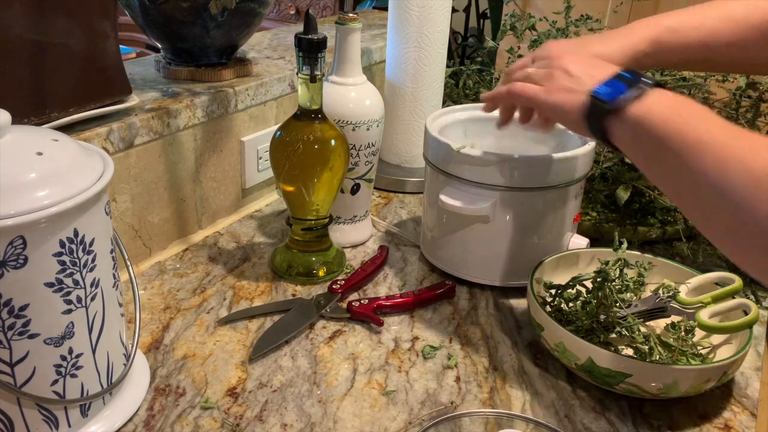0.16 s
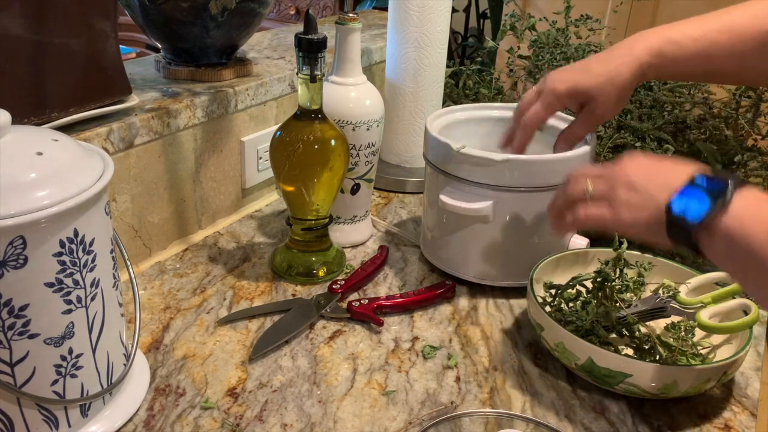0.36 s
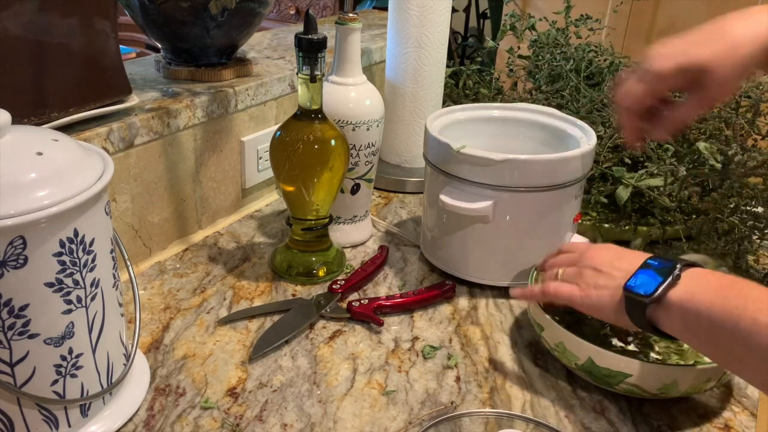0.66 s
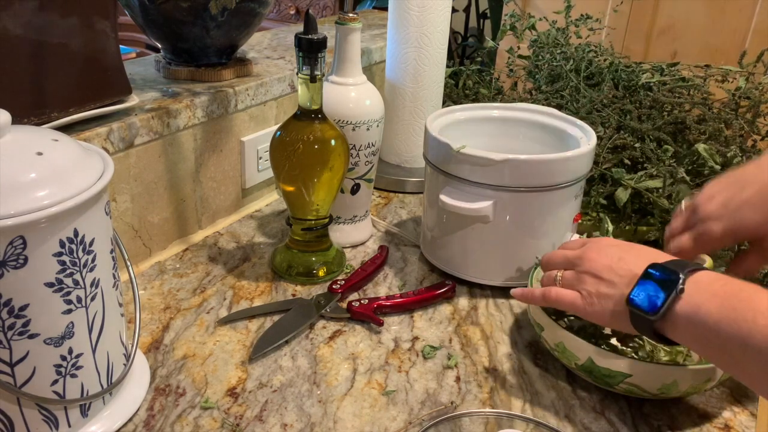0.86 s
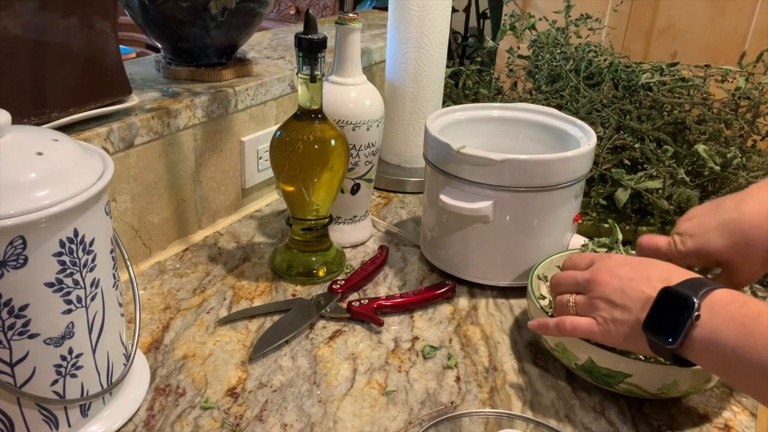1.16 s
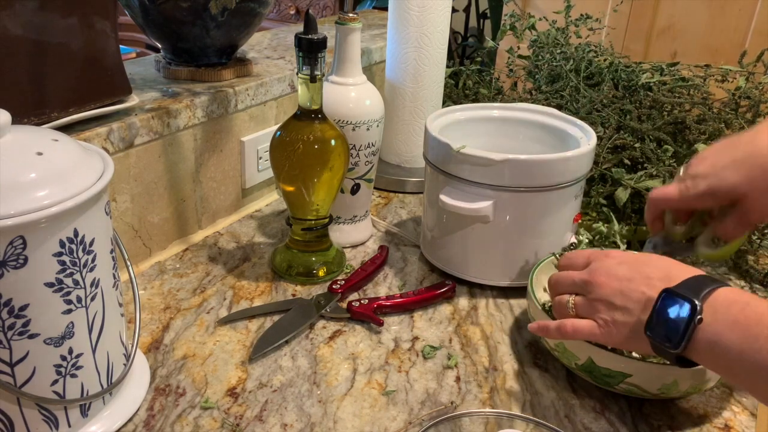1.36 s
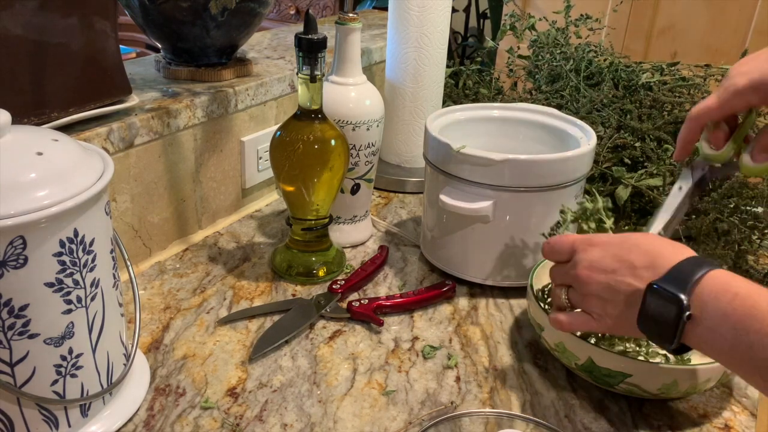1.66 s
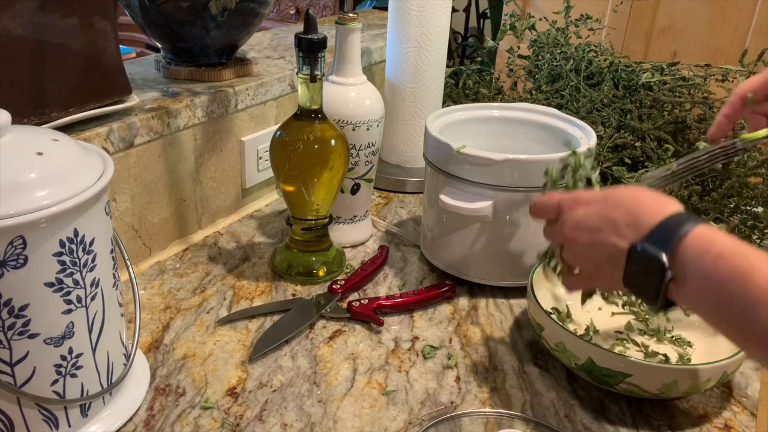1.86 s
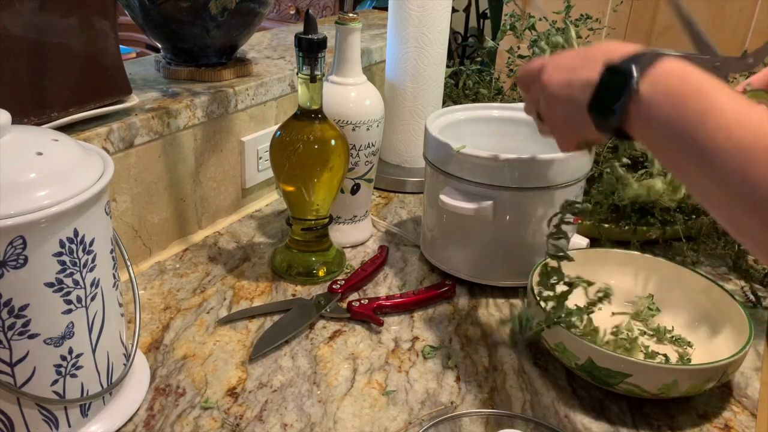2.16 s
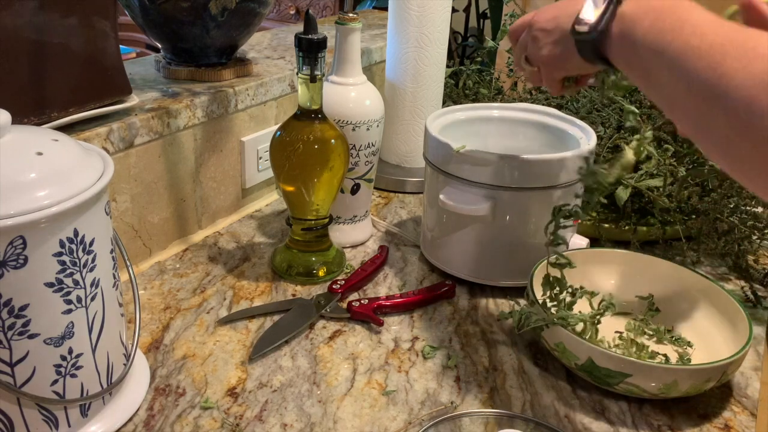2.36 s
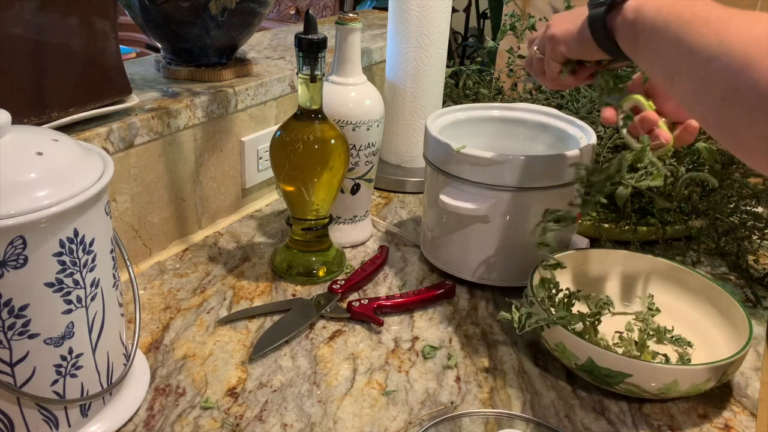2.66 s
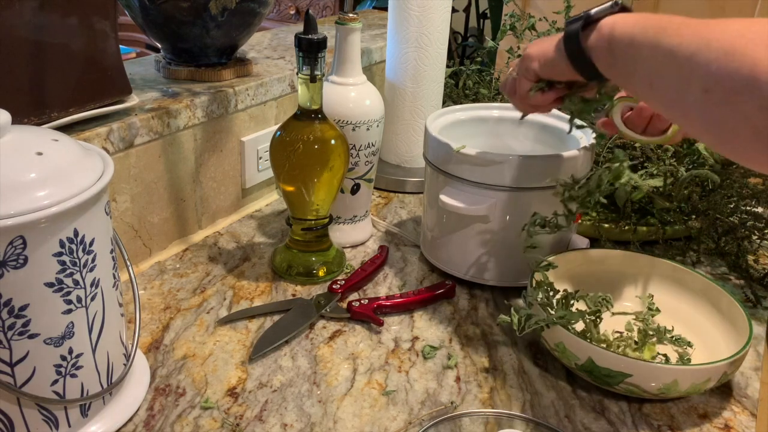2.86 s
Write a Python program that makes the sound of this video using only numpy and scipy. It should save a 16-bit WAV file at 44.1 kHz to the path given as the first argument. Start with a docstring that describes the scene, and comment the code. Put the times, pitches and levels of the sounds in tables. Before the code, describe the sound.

Dry herbs rustle and crackle close to a phone microphone: near silence, a dense loud burst with dull knocks on a ceramic bowl, then lighter uneven rustles and snaps in a quiet kitchen with faint hum.

```python
"""Hands gather and lift dry herb sprigs out of a ceramic bowl on a kitchen counter, close to a phone.
Leaves rustle as dense tiny cracks, stems snap, scissors knock the bowl so that it rings briefly;
a fridge hums over quiet room noise and slow air pressure rocks the microphone."""
import sys
import numpy as np
from scipy import signal
from scipy.fft import rfft, irfft, next_fast_len
from scipy.io import wavfile
from scipy.ndimage import uniform_filter1d

SR = 44100
rng = np.random.default_rng(int(sys.argv[2]) if len(sys.argv) > 2 else 0)


def unload_wav(signal):
    """Save mono or channel-first audio to the path in sys.argv[1] as 16-bit WAV at rate SR, clipped to [-1, 1]."""
    wavfile.write(
        sys.argv[1],
        SR,
        np.round(np.clip(np.atleast_2d(signal).T, -1, 1) * 32767).astype(np.int16),
    )


N = 132300

# handling of the herbs (s, level dB of: leaf rustle, its top octave, stem scrape, the rustle's lower treble)
HANDLING = [(0.0, -60, -65, -72, -69), (0.05, -75, -72, -71, -74),
            (0.12, -61.5, -68, -84, -67),
            (0.21, -62, -67.5, -72, -80),
            (0.3, -71, -84, -66.5, -72.5), (0.4, -78, -91, -86, -87),
            (0.47, -77, -80, -94, -105), 
            (0.5205, -74, -87, -89, -86), (0.5225, -58, -71, -69, -70),
            (0.54, -43.5, -43, -59, -46), (0.56, -42, -54, -53.5, -51),
            (0.62, -44, -42.5, -45.5, -47), (0.68, -41, -48, -57, -48),
            (0.72, -46.5, -50, -71, -56.5), 
            (0.82, -45.5, -63, -70, -58.5), (0.85, -52, -54, -63, -64),
            (0.88, -43, -51, -70, -50), (0.93, -53, -63, -47, -62),
            (0.96, -56, -62, -59.5, -62), (1.03, -56.5, -71, -62, -70.5),
            (1.1, -59, -66, -64, -73), 
            (1.25, -53.5, -70, -63, -72), (1.33, -47, -60, -60, -62),
            (1.42, -51.5, -64, -67, -69), (1.52, -59, -65, -65, -66.5),
            (1.62, -62.5, -73, -73, -71), (1.67, -48.5, -61, -69, -58),
            (1.75, -55.5, -65.5, -69, -68), (1.84, -48, -55, -80, -51),
            (1.9, -54, -61, -68, -59.5), (1.98, -53, -63.5, -79, -57.5),
            (2.1, -49, -60, -64.5, -58.5), (2.2, -50, -60, -63.5, -54), (2.3, -55.5, -57.5, -69, -61),
            (2.4, -55, -67, -70, -61), (2.51, -60.5, -63, -68, -65), (2.6, -56.5, -61, -65.5, -66.2),
            (2.7, -54, -59, -59, -63.7), (2.76, -52, -56.0, -58, -67),
            (2.84, -44, -47.5, -52.5, -57.5), (2.91, -48.5, -56, -52, -65),
            (3.0, -58, -80, -66, -70)]
# colour of leaves and of stems (Hz, dB per Hz)
LEAF = [(1760, -12.5), (3000, -13.5), (4600, -6), (6570, 6), (7560, 7), (8700, 0), (11000, -8), (15100, -25.5),
        (16000, -20)]
STEM = [(300, -26.5), (545, -8), (750, -14.5), (1300, -13), (1950, -7), (2350, 1), (2750, -8), (3300, -8.5), (4500, -16)]  # fixed
STEM_GRAINS_PER_S, STEM_SPREAD_DB, STEM_GRAIN_S = 1400, 0.5, 0.0017
# snaps of leaves and stems (s, level dB, centre Hz, stem share dB, length s)
SNAPS = [(0.0067, -54, 4000, -16, 0.0136), (0.0764, -51, 5600, -8, 0.0059), (0.1103, -54, 9800, -20, 0.0041),
         (0.1229, -52, 7500, -17, 0.0063), (0.1325, -48, 8200, -21, 0.0082), (0.1397, -49, 10900, -14, 0.0082),
         (0.2722, -60, 8200, -13, 0.005), (0.37, -65, 4000, -13, 0.01), (0.5225, -47, 7500, -21, 0.003),
         (0.5704, -32, 4800, -11, 0.0118), (0.601, -30, 7900, -17, 0.0036), (0.6097, -27, 4000, -24, 0.0036),
         (0.6195, -33, 4500, -24, 0.0077), (0.6398, -29, 7500, -32, 0.005), (0.6453, -30, 4900, -24, 0.0073),
         (0.6895, -32, 7000, -24, 0.004), (0.693, -27, 6000, -25, 0.0091), (0.6993, -33, 5900, -19, 0.0109),
         (0.7039, -33, 6800, -19, 0.0063), (0.7083, -31, 10300, -25, 0.0045), (0.7171, -26, 10100, -33, 0.0023),
         (0.7458, -31, 6600, -30, 0.0063), (0.7495, -36, 7700, -24, 0.0086), (0.7648, -26, 5900, -35, 0.0018),
         (0.7932, -25, 8800, -33, 0.002), (0.7963, -24, 8100, -33, 0.0027), (0.8, -35, 5000, -21, 0.0059),
         (0.8064, -33, 7900, -41, 0.0032), (0.8147, -32, 7800, -27, 0.0018), (0.8407, -34, 8000, -37, 0.0036),
         (0.8653, -30, 9100, -23, 0.0018), (0.8684, -34, 6200, -21, 0.0068), (0.8826, -28, 9600, -20, 0.0018),
         (0.9118, -31, 5900, -38, 0.0027), (0.9277, -39, 6400, -9, 0.0091), (1.0078, -41, 6800, -26, 0.0027),
         (1.0966, -40, 13900, -23, 0.0027), (1.1078, -41, 8100, -37, 0.0018), (1.117, -33, 7300, -22, 0.0018),
         (1.2863, -39, 8200, -24, 0.0054), (1.3236, -35, 6700, -16, 0.0027), (1.3965, -39, 7800, -23, 0.0014),
         (1.4946, -32, 7400, -23, 0.0023), (1.4996, -43, 5700, -12, 0.0082), (1.5446, -42, 6000, -35, 0.0018),
         (1.5707, -48, 8000, -21, 0.0073), (1.6582, -34, 8300, -29, 0.0023), (1.6638, -38, 6300, -21, 0.0018),
         (1.675, -36, 8200, -25, 0.0018), (1.6794, -27, 7400, -32, 0.0023), (1.7106, -32, 7300, -26, 0.0032),
         (1.7287, -41, 5700, -18, 0.0068), (1.7656, -36, 7500, -31, 0.0018), (1.7749, -37, 5900, -24, 0.0023),
         (1.7875, -37, 7000, -28, 0.002), (1.7895, -31, 6600, -29, 0.0027), (1.8078, -37, 6200, -40, 0.0036),
         (1.8165, -41, 6700, -30, 0.006), (1.8318, -34, 6500, -24, 0.0023), (1.834, -40, 5000, -14, 0.01),
         (1.8417, -31, 6500, -24, 0.0036), (1.9858, -37, 7800, -24, 0.005), (1.9907, -39, 7900, -22, 0.0054),
         (2.0015, -37, 7900, -18, 0.0041), (2.0316, -38, 6200, -37, 0.0032), (2.0605, -37, 6400, -30, 0.0023),
         (2.1955, -39, 6000, -21, 0.0095), (2.2162, -41, 8100, -12, 0.0041), (2.2737, -33, 6700, -11, 0.0059),
         (2.2791, -36, 6000, -16, 0.0082), (2.3606, -42, 7400, -20, 0.0054), (2.422, -41, 6300, -31, 0.0032),
         (2.4611, -45, 6600, -16, 0.0118), (2.4996, -39, 8900, -23, 0.0032), (2.533, -31, 6100, -23, 0.0032),
         (2.601, -40, 10600, -19, 0.0023), (2.6512, -32, 7500, -25, 0.0032), (2.6671, -39, 12300, -19, 0.0036),
         (2.702, -40, 7500, -35, 0.0036), (2.7122, -36, 10800, -9, 0.0036), (2.7209, -36, 10900, -5, 0.0091),
         (2.7581, -39, 7400, -3, 0.0091), (2.7998, -33, 7600, -10, 0.0045), (2.8087, -32, 7200, -19, 0.0018),
         (2.8259, -30, 6800, -22, 0.0018), (2.8315, -30, 7300, -21, 0.0023), (2.8988, -37, 4400, -12, 0.0068),
         (2.9093, -38, 7700, -18, 0.0086), (2.9246, -44, 6200, -4, 0.0073), (2.9744, -39, 10700, -19, 0.0036)]  # fixed
# ring of the bowl (Hz, t60 s)
BOWL = [(673, .15), (1508, .25), (2579, .25), (3835, .21), (5208, .11), (6702, .1)]  # fixed
# knocks on the bowl (s, dB of each mode (none where hands damp it), clack dB, clack Hz, clack t60 s, pitched share of the clack 0-1)
KNOCKS = [(.5712, (-58, -66, -62, -48, -36, -33), -32, 1500, .016, .7),  # fixed
          (.5735, (), -33, 620, .045, .7),  # fixed
          (.581, (), -36, 1000, .03, .6),  # fixed
          (.587, (), -37, 520, .03, .5),  # fixed
          (.635, (), -41, 1150, .025, .6),  # fixed
          (.651, (), -43, 1500, .05, .7),  # fixed
          (.917, (-54, -64, -70, -51, -49, -50), -37, 1680, .022, .85),  # fixed
          (.935, (-43, -56, -58, -64, -62, -62), -31, 1560, .022, .95),  # fixed
          (1.140, (), -55, 1300, .03, .3),  # fixed
          (1.161, (), -51, 1560, .04, .85)]  # fixed
ROOM_T60_S, ROOM_DB = .25, -13  # fixed
# room noise (Hz, dB per Hz)
AIR = [(35, -3), (60, -6.5), (100, -12.5), (160, -11.5), (300, -19), (700, -26.5), (1500, -32), (3000, -36), (7000, -45), (16000, -50.5)]
AIR_DB, HUM_HZ, HUM_DB, HUM_WAVER_DB = -61, 119.7, -60.5, 1.2
# slow air pressure: colour (Hz, dB per Hz) and level (s, dB)
PRESSURE = [(1, -15.5), (3, -2), (7, 6), (12, -18.5), (20, -22), (30, -27), (35, -80), (42, -47), (60, -114)]
PRESSURE_LEVEL = [(0, -37.5), (.4, -31), (.7, -28), (1.1, -33.5), (1.4, -38.5), (1.9, -31.5), (2.4, -32), (2.7, -44), (3, -31.5)]
TOP_HZ = 16000  # fixed
# colour of stems while they scrape the bowl, until they are lifted out (Hz, dB per Hz)
STEM_IN_BOWL = [(200, -11.5), (350, -16), (600, -2), (850, -2), (1100, -3.5), (1550, -1), (1900, -3), (3000, -12), (4500, -14.5)]
LIFT_S, LIFT_LASTS_S = 1.18, 0.79
SNAP_WIDTH, SNAP_CENTRE_DB, SNAP_RISE, SNAP_RAGGED_DB = .2, 9, .18, 1.8  # fixed; width as share of centre, rise as share of length
SCRAPE_RING_DB = -23  # fixed
GRAINS_PER_S, GRAIN_S = 3000, .0012  # fixed; leaf cracks
GRAIN_SPREAD_DB, CLUSTER_DB, SNAP_BRIGHT = 2.4, 2.1, 0.4  # fixed; brightness = share of the last sample taken off
# faint thin tones (start s, length s, Hz, dB rms)
TONES = [(.12, .09, 1610, -77), (.22, .12, 1735, -76), (1.645, .18, 1507, -75)]  # fixed
SNAP_TINT = .7  # fixed; share of the leaf colour that a snap takes on, so it spans more of the treble


def undb(db):
    """Decibels to gain."""
    return 10 ** (np.asarray(db) / 20)


def unit(x):
    """Scale to rms 1."""
    return x / np.sqrt(np.mean(x ** 2))


def curve(table, axis):
    """A table column joined by straight lines in time."""
    rows = np.array(table)
    return np.interp(np.arange(N) / SR, rows[:, 0], rows[:, axis])


def colour(x, table):
    """Filter by (Hz, dB) points; the end levels hold beyond the ends."""
    size = next_fast_len(len(x) + 4096)  # fixed
    rows, hz = np.array(table), np.maximum(np.fft.rfftfreq(size, 1 / SR), 1e-3)  # fixed
    return irfft(rfft(x, size) * undb(np.interp(np.log(hz), np.log(rows[:, 0]), rows[:, 1])), size)[:len(x)]


def band(x, hz, width):
    """Two-pole resonance, gain 1 at the centre; width as share of the centre."""
    return signal.lfilter(*signal.iirpeak(min(hz, .45 * SR), 1 / np.clip(width, .02, 2), SR), x)  # fixed


def walk(rate):
    """Random levels held 1 / rate s and slewed; spread near 1."""
    k = int(SR / rate)
    return unit(uniform_filter1d(np.repeat(rng.standard_normal(N // k + 1), k), k)[:N])


def add(out, at_s, x):
    """Mix x into out from a given time."""
    i = int(at_s * SR)
    out[i:i + len(x)] += x[:len(out) - i]


def grains(per_s, spread_db, grain_s):
    """Noise gated by random cracks of very unequal size, each dying away in grain_s."""
    chance = rng.random((2, N))
    sizes = (chance[0] < per_s / SR) * undb(np.minimum(-np.log(1 - chance[1]), 5) * spread_db)  # fixed
    return signal.lfilter([1], [1, -np.exp(-1 / (max(grain_s, 1e-4) * SR))], sizes) * rng.standard_normal(N)  # fixed


def rustle():
    """Leaf cracks, each in its own part of the treble, and duller stem scrapes come in the same clusters."""
    cluster = undb(CLUSTER_DB * walk(45.12))
    parts = [band(grains(GRAINS_PER_S / 5, GRAIN_SPREAD_DB, GRAIN_S), hz, .6) for hz in 3500 * 1.45 ** np.arange(5)]  # fixed
    leaves = colour(sum(unit(p) * 1.2 ** k for k, p in enumerate(parts)), LEAF) * cluster  # fixed
    top = colour(leaves, [(7500, -30), (9500, -8), (12000, 0)])  # fixed
    low = colour(leaves, [(4200, 0), (5200, -6), (6500, -30)])  # fixed
    leaves = sum(unit(part) * undb(curve(HANDLING, axis=k)) for part, k in ((leaves - top - low, 1), (top, 2), (low, 4)))
    stems = grains(STEM_GRAINS_PER_S, STEM_SPREAD_DB, STEM_GRAIN_S) * cluster
    lifted = np.clip((np.arange(N) / SR - LIFT_S) / LIFT_LASTS_S, 0, 1)
    stems = np.sqrt(lifted) * unit(colour(stems, STEM)) + np.sqrt(1 - lifted) * unit(colour(stems, STEM_IN_BOWL))
    return leaves, stems * undb(curve(HANDLING, axis=3))


def snaps():
    """Each snap is a ragged burst that swells and dies, with its own centre in the treble and a duller stem part."""
    out, t = np.zeros(N), np.arange(1600) / SR  # fixed
    noise = rng.standard_normal((len(SNAPS), 3, len(t)))
    for (at, db, hz, stem_db, length), (a, b, c) in zip(SNAPS, noise):
        u = t / np.clip(length, .0003, .015)  # fixed
        swell = np.minimum(u / SNAP_RISE, 1) * np.exp(-2 * np.maximum(u - SNAP_RISE, 0))
        shape = swell * undb(SNAP_RAGGED_DB * unit(uniform_filter1d(c, size=24)))
        top = colour(a * shape + undb(SNAP_CENTRE_DB) * band(a * shape, hz, SNAP_WIDTH), np.array(LEAF) * [1, SNAP_TINT])
        top = signal.lfilter([1, -SNAP_BRIGHT], [1], top)
        low = colour(b * shape, STEM if at > LIFT_S else STEM_IN_BOWL)
        add(out, at, undb(db) * np.sqrt(np.mean(swell ** 2)) * (unit(top) + undb(stem_db) * unit(low)))
    return out


def bowl(scrape):
    """Each knock rings the modes as its place allows and adds a short clack; scraping stems ring the bowl faintly."""
    out, t = np.zeros(N), np.arange(SR // 2) / SR
    fade = lambda t60: np.exp(-np.log(1000) * t / t60)
    modes = np.array([fade(t60) * np.sin(2 * np.pi * hz * t) for hz, t60 in BOWL])
    for (at, dbs, clack_db, clack_hz, clack_s, pitched), noise in zip(KNOCKS, rng.standard_normal((len(KNOCKS), len(t)))):
        pitched = np.clip(pitched, 0, 1)
        clack = pitched * unit(fade(clack_s) * np.sin(2 * np.pi * clack_hz * t))
        clack = clack + (1 - pitched) * unit(colour(noise * fade(clack_s), STEM_IN_BOWL))
        add(out, at, undb(dbs) @ modes[:len(dbs)] + undb(clack_db) * clack / np.abs(clack).max())
    return out + undb(SCRAPE_RING_DB) * signal.fftconvolve(scrape, unit(modes.sum(axis=0)) / np.sqrt(len(t)))[:N]


def kitchen():
    """Room noise, fridge hum and slow pressure."""
    air = unit(colour(rng.standard_normal(N), [(11, -87)] + AIR)) * undb(AIR_DB + 1.0 * walk(6.0))
    hum = np.sqrt(2) * np.sin(2 * np.pi * HUM_HZ * np.arange(N) / SR) * undb(HUM_DB + HUM_WAVER_DB * walk(8.33))
    return air + hum + unit(colour(rng.standard_normal(N), PRESSURE)) * undb(curve(PRESSURE_LEVEL, axis=1))


def tones():
    """Faint steady tones that fade in and out."""
    out = np.zeros(N)
    for at, length, hz, db in TONES:
        t = np.arange(int(length * SR)) / SR
        add(out, at, np.sqrt(2) * undb(db) * signal.windows.tukey(len(t), .5) * np.sin(2 * np.pi * hz * t))
    return out


def scene():
    """Herbs and bowl close by, a little of the kitchen's echo."""
    leaves, stems = rustle()
    near = leaves + stems + snaps() + bowl(stems)
    t = np.arange(SR // 2) / SR
    tail = rng.standard_normal(len(t)) * np.exp(-np.log(1000) * t / ROOM_T60_S) * np.minimum(t / 0.0031, 1)
    echo = signal.fftconvolve(near, tail / np.sqrt(np.sum(tail ** 2)))[:N]
    return (near + undb(ROOM_DB) * echo + kitchen() + tones())[None]


def record(dry):
    """The phone cuts the top."""
    return signal.sosfilt(signal.ellip(10, .2, 70, TOP_HZ, fs=SR, output="sos"), dry)  # fixed


dry = scene()
out = record(dry)
unload_wav(out)
```